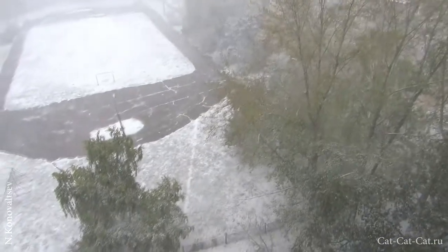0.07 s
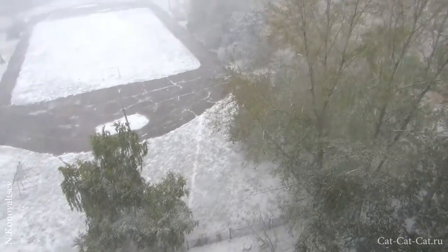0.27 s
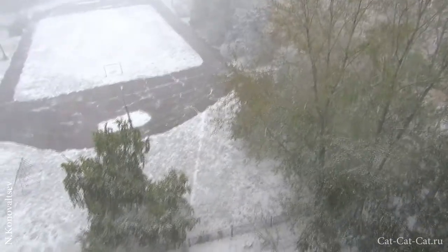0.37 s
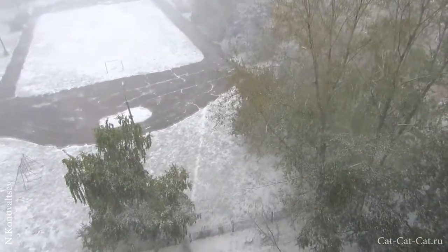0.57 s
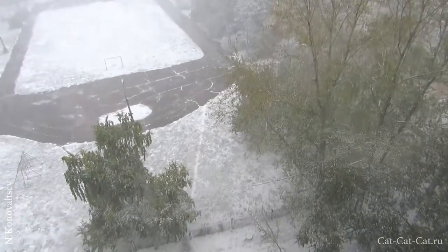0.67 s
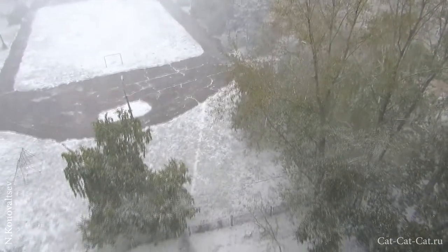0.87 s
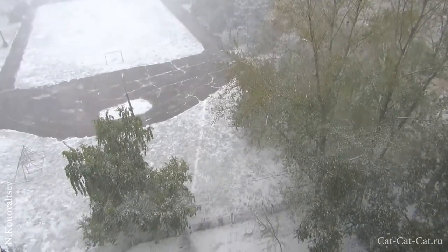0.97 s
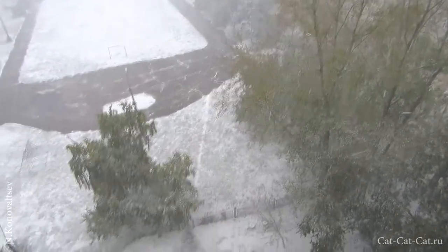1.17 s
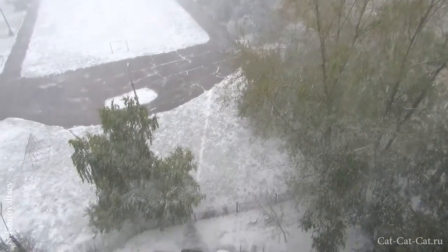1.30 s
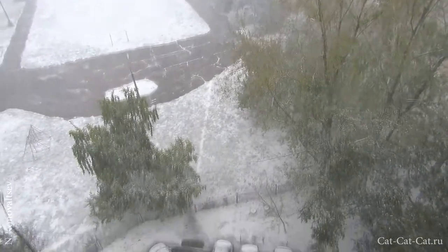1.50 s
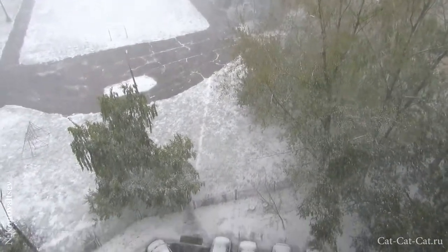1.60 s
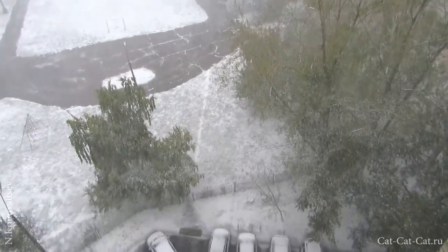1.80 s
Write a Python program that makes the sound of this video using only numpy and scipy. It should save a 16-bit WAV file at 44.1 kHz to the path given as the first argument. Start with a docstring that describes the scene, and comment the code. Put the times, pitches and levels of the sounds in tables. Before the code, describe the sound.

A steady rush of outdoor wind, with gusty rumble and a faint handling knock.

```python
"""A snowy yard in the wind, heard from a hand-held camera high above the trees.
Turbulence in the trees makes a steady rush, and icy flakes tick on the case by impact.
Over this, gusts buffet the two microphone ports in opposite phase and single eddies thump them.
A knock from handling overloads the microphone; the gain control ducks after peaks and creeps back."""
import sys
import numpy as np
from scipy import signal
from scipy.fft import rfft, irfft, next_fast_len
from scipy.io import wavfile
from scipy.ndimage import uniform_filter1d

SR = 44100
rng = np.random.default_rng(int(sys.argv[2]) if len(sys.argv) > 2 else 0)


def to_wav(s):
    """Save 16-bit WAV."""
    ch = np.atleast_2d(s).T  # columns
    pcm = np.round(np.clip(ch, -1, 1) * 32767)  # PCM
    wavfile.write(sys.argv[1], SR, pcm.astype(np.int16))


N = 81585

# Spectrum of the wind in the trees: frequency_hz, relative_db
RUSH_SPECTRUM = [(15, -24), (28, 4.5), (70, -1.5), (160, -1), (280, -8.5), (400, -13.5), (800, -17),
                 (1300, -18.5), (2050, -24), (3600, -32), (4000, -40), (5200, -36), (7000, -40),
                 (8000, -41), (9500, -39.5), (13200, -42), (14300, -50), (15200, -71), (16500, -78)]
# Likeness of the rush in left and right: frequency_hz, correlation
RUSH_COHERENCE = [(60, 0.71), (400, 0.55), (1200, 0.74), (2000, 0.73), (3300, 0.51), (5500, 0.24),
                  (9000, 0.16), (15000, 0)]
# Envelope of the rush below the treble: time_s, level_db
RUSH_ENVELOPE = [(0, -43.5), (.15, -41.5), (.36, -37.5), (.47, -37.8), (.58, -39), (.75, -36.5),
                 (.88, -37.5), (1.0, -40), (1.3, -38.5), (1.55, -38.5), (1.85, -38)]
# Envelope of the treble of the rush: time_s, level_db
HISS_ENVELOPE = [(0, -44.5), (.15, -41.5), (.37, -38), (.52, -41), (.75, -38.5), (.97, -39.5), (1.33, -40),
                 (1.6, -38.5), (1.85, -38.5)]
# Impacts of icy flakes on the case: start_s, relative_db, pan_db, pitch_hz
FLAKE_IMPACTS = [(.009, -52, -1, 11000), (.032, -49.5, -4, 12800), (.0963, -54, -2, 7500),
                 (.1135, -50, 1, 10500), (.120, -47, 0, 7200), (.128, -50, 0, 12500),
                 (.137, -45, -5, 10700), (.2135, -47, 0, 13000), (.3507, -48, -1, 13000),
                 (.6535, -49, 0, 12500), (.7297, -43, -7, 12300), (0.761, -44.5, 7, 11100),
                 (0.806, -44, 0, 7400), (0.8196, -38.5, -6, 12800), (.823, -39.5, 1, 4600),
                 (0.8755, -42, -4, 9500), (.995, -45, -4, 12800), (1.0208, -37, 0, 6440),
                 (1.034, -48, -2, 13000), (1.065, -41, -5, 12100), (1.1185, -41.5, 3, 12600),
                 (1.1616, -37.5, -8, 7040), (1.175, -40, 6, 13000), (1.1978, -35, 6, 6460),
                 (1.2199, -36, 1, 12500), (1.226, -44, -3, 7000), (1.2456, -40, 0, 7200),
                 (1.259, -44, 0, 6000), (1.272, -38, -3, 10500), (1.282, -47, -3, 8800),
                 (1.403, -43, -6, 8450), (1.4442, -40.5, -1, 12900), (1.451, -41.5, 1, 5200),
                 (1.4925, -44, -1, 6000), (1.510, -39.5, -2, 6300), (1.5209, -39, -1, 12900),
                 (1.533, -41, -1, 10800), (1.6054, -37.5, -9, 13100), (1.6697, -41.5, 1, 8650),
                 (1.702, -46, -2, 8950), (1.7255, -42, 0, 11100)]
# Spectrum of a flake's tick: frequency_hz, relative_db
TICK_SPECTRUM = [(500, -12), (2000, -18), (4000, -15.5), (5600, -12.5), (7000, -9), (8000, -15),
                 (10500, -12), (13200, -11), (14500, -23), (16000, -37)]
# Spectrum of the crack of the knocked case: frequency_hz, relative_db
CRACK_SPECTRUM = [(1500, -24), (4500, -10), (5800, -2), (8500, -6), (11000, -2.5), (13000, -2),
                  (15000, -22), (16500, -28)]
# Normal modes of the case: pitch_hz, level_db, decay_s
CASE_MODES = [(2630, -26.5, 0.0005), (3450, -25, 0.00065), (6900, -30, 0.00057)]
# Single eddies at the ports: centre_s, gain_db, decay_s, edge_s, pan_db
AIR_BUMPS = [(0.4272, -4, 0.0078, 0.002, -1.5), (0.451, -1, 0.0084, 0.002, 4.5),
             (0.4635, -1, 0.0025, 0.00098, -4), (0.73, -3, 0.0012, 0.00096, -2.5),
             (0.7604, 1, 0.0042, 0.0015, 6), (0.9135, -3, 0.0056, 0.0015, 3),
             (0.9247, 1, 0.0023, 0.00096, -2), (1.074, -8.5, 0.0026, 0.001, 4),
             (1.162, -7.5, 0.00082, 0.00048, -3), (1.1983, -10.5, 0.0013, 0.00045, 4),
             (1.234, -11.5, 0.0071, 0.0013, 5.5), (1.6052, -9, 0.0015, 0.00083, -4.5)]
# Spectrum of the turbulence at the ports: frequency_hz, relative_db
EDDY_SPECTRUM = [(10, -32), (22, 2), (45, 1), (105, -2.5), (180, -10.5), (290, -17), (420, -26), (820, -57),
                 (1600, -81), (4000, -94)]
# Envelope of the buffeting: time_s, level_db
GUST_ENVELOPE = [(0.0, -36), (0.05, -39), (0.085, -24.5), (0.15, -35), (0.21, -24.5), (0.304, -36),
                 (0.395, -24.5), (0.422, -17.5), (0.468, -14), (0.52, -20.5), (0.584, -38), (0.659, -28.5),
                 (0.69, -38.5), (0.765, -27), (0.785, -23), (0.812, -15), (0.885, -26), (0.903, -10.5),
                 (0.928, -12.5), (0.983, -32.5), (1.06, -34), (1.12, -23), (1.16, -32), (1.2, -37),
                 (1.237, -21), (1.275, -38), (1.402, -21), (1.5, -42.5), (1.61, -41), (1.656, -44),
                 (1.74, -36), (1.85, -29.5)]


def amp(db):
    """Amplitude ratio for a level in decibels."""
    return 10 ** (np.asarray(db) / 20)


def unit_rms(x):
    """Normalisation to unit mean power."""
    return x / np.sqrt(np.mean(x ** 2) + 1e-20)


def spectrum_at(points, hz):
    """Interpolation of a table on a logarithmic frequency axis."""
    table_hz, value = np.transpose(points)
    return np.interp(np.log(hz + 1), np.log(table_hz + 1), value)


def envelope(points):
    """Linear interpolation of a time table at every sample."""
    return np.interp(np.arange(N) / SR, *np.transpose(points))


def coloured(x, points):
    """Spectral shaping that conserves the power of white noise."""
    size = next_fast_len(N)
    response = unit_rms(amp(spectrum_at(points, np.fft.rfftfreq(size, 1 / SR))))
    return irfft(rfft(x, size) * response, size)[..., :N]


def highpass(x, hz, order=2, apply=signal.sosfilt):
    """Butterworth high-pass filtering."""
    return apply(signal.butter(order, hz, "high", fs=SR, output="sos"), x)


def panned(db):
    """Stereo gains for a level difference, left minus right."""
    return amp([[db / 2], [-db / 2]])


def add(mix, start_s, sound):
    """Superposition of a stereo sound on the mix."""
    part = mix[:, max(round(start_s * SR), 0):][:, :sound.shape[1]]
    part += sound[:, :part.shape[1]]


def tree_rush(patch_db=1.1, hiss_hz=4200):
    """Turbulence in the trees radiates broadband noise; its diffuse treble has low coherence."""
    frames, hz = N // 256 + 5, np.fft.rfftfreq(1024, 1 / SR)
    left_re, left_im, other_re, other_im, patches = rng.standard_normal((frames, len(hz), 5)).T
    patches = uniform_filter1d(patches, size=12, axis=0)  # smooth over frequency
    patches = unit_rms(uniform_filter1d(patches, size=14, axis=1))  # and over time
    coherence = spectrum_at(RUSH_COHERENCE, hz)[:, None]
    left = left_re + 1j * left_im
    right = coherence * left + np.sqrt(1 - coherence ** 2) * (other_re + 1j * other_im)
    spectra = np.array([left, right]) * amp(spectrum_at(RUSH_SPECTRUM, hz)[:, None] + patch_db * patches)
    noise = unit_rms(signal.istft(spectra, nperseg=1024, noverlap=768)[1][:, :N])
    hiss = highpass(noise, hiss_hz, order=4, apply=signal.sosfiltfilt)
    body = (noise - hiss) * amp(envelope(RUSH_ENVELOPE)) * panned(1.27)
    return body + hiss * amp(envelope(HISS_ENVELOPE)) * panned(-0.49)


def icy_flakes(rise_s=0.000067, tick_decay_s=0.00083, ping_decay_s=0.0013, fine_per_s=45):
    """Impact excitation: a flake shatters in a tick, and the struck spot rings as a damped resonator."""
    ticks, pings = np.zeros((2, 2, N))
    t = np.arange(SR // 100) / SR
    rise = 1 - np.exp(-t / rise_s)

    def tick(start_s, gain):
        """Brittle fracture gives a noise burst about a millisecond long."""
        add(ticks, start_s, gain * rng.standard_normal((2, len(t))) * rise * np.exp(-t / tick_decay_s))

    for start_s, relative_db, pan_db, pitch_hz in FLAKE_IMPACTS:
        gain = amp(relative_db - 1.5) * panned(pan_db)
        tick(start_s, gain)
        ping = rise * np.exp(-t / ping_decay_s) * np.sin(2 * np.pi * pitch_hz * t)
        add(pings, start_s, gain * amp(-7) * ping)
        for delay_s in rng.random(size=2) * 0.007:  # two shards land just after the flake
            tick(start_s + delay_s, gain * amp(-11))
    for _ in range(int(fine_per_s * N / SR)):  # the smallest flakes fall at random
        start_s = rng.random() * N / SR
        relative_db = -53.5 - 3 * min(rng.exponential(), 3)
        tick(start_s, amp(relative_db) * panned(rng.normal(-2.6, 4.5)))
    return coloured(ticks, TICK_SPECTRUM) + pings


def pressure_pulse(centre_s, gain_db, decay_s, edge_s, pan_db, lag_s):
    """A bipolar pulse builds, flips and dies away; the right port gets it inverted and lag_s later."""
    t = np.arange(N) / SR - centre_s - np.array([[0], [lag_s]])
    pulse = np.tanh(t / edge_s) * np.exp(-abs(t) / decay_s)
    return amp(gain_db) * panned(pan_db) * pulse * [[1], [-1]]


def handling_knock(centre_s=1.0594, crack_lead_s=0.00032, crack_width_s=0.00056):
    """An impulsive force pushes on the ports; the case gives with a crack and rings in its modes."""
    thud = pressure_pulse(centre_s, gain_db=4.5, decay_s=0.00094, edge_s=0.00033, pan_db=6.5, lag_s=7e-5)
    t = np.arange(N) / SR - centre_s + crack_lead_s
    burst = np.exp(-(t / crack_width_s) ** 2) * rng.standard_normal((2, N))
    crack = amp(-25.5) * coloured(burst, CRACK_SPECTRUM)
    age_s = np.maximum(t, 0)
    ring = sum(amp(level_db) * np.exp(-age_s / decay_s) * np.sin(2 * np.pi * pitch_hz * age_s)
               for pitch_hz, level_db, decay_s in CASE_MODES)
    return highpass(thud, hz=65) + panned(14) * (crack + ring)


def air_bumps():
    """Single large eddies thump the microphone with pressure transients."""
    return highpass(sum(pressure_pulse(*bump, lag_s=0.000089) for bump in AIR_BUMPS), hz=47.4)


def gust_buffeting(bright_hz=184, bright_db_per_db=2.5, neutral_db=-12.5, steady_s=0.016, own_gain=0.26):
    """Turbulent pressure drives the ports in antiphase; stronger gusts carry smaller, brighter eddies."""
    level_db = envelope(GUST_ENVELOPE)
    eddies = coloured(rng.standard_normal((3, N)), EDDY_SPECTRUM)
    small_eddies = highpass(eddies, bright_hz, order=1, apply=signal.sosfiltfilt)
    eddies = eddies + small_eddies * (amp(bright_db_per_db * (level_db - neutral_db)) - 1)
    window = signal.windows.hann(int(2 * steady_s * SR))
    power = signal.fftconvolve(eddies ** 2, window[None] / window.sum(), "same", axes=1)
    shared, left, right = eddies / np.sqrt(abs(power) + 1e-9)  # steadied, so the envelope sets the level
    ports = np.array([shared + own_gain * left, -shared + own_gain * right])
    return amp(level_db) * ports * panned(0.43)


def scene():
    """The pressures of the distant wind and of all that touches the camera add linearly."""
    return tree_rush() + gust_buffeting() + air_bumps() + handling_knock() + icy_flakes()


def record(dry, sense_hz=572, threshold_db=-23.5, slope=0.63, recover_s=0.36, band_limit_hz=16450):
    """Saturation, then gain control with fast attack and slow release, then a band limit."""
    clipped = np.clip(dry, -1, 1)
    sensed = highpass(clipped, sense_hz)
    power = signal.lfilter(np.ones(128) / 128, 1, (sensed ** 2).mean(0))
    reduction_db = slope * np.maximum(10 * np.log10(abs(power) + 1e-12) - threshold_db, 0)
    release = np.exp(np.arange(N) / SR / recover_s)
    held_db = np.maximum.accumulate(reduction_db * release) / release  # each peak decays exponentially
    duck_db = signal.lfilter(np.ones(400) / 400, 1, held_db)
    lowpass = signal.firwin(511, band_limit_hz, window=("kaiser", 9), fs=SR)
    return signal.oaconvolve(clipped * amp(-duck_db), lowpass[None], "same")


dry = scene()
out = record(dry)
to_wav(out)
```